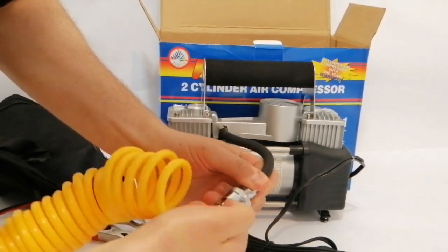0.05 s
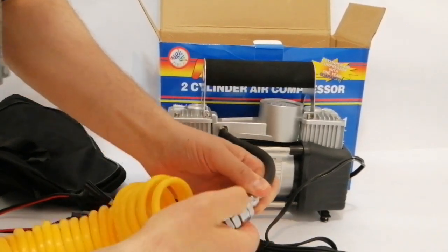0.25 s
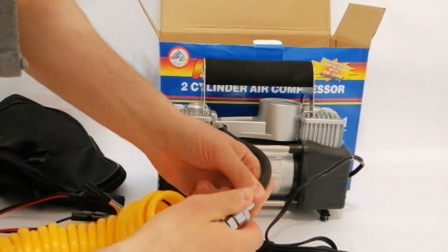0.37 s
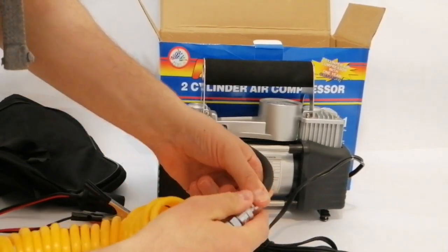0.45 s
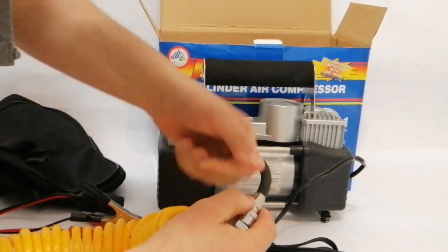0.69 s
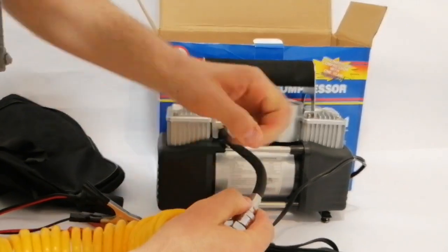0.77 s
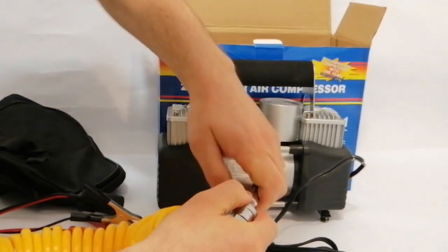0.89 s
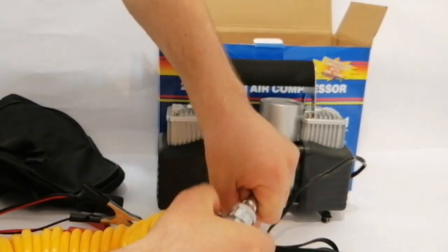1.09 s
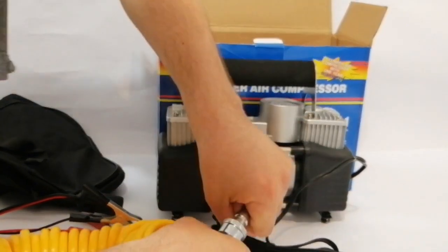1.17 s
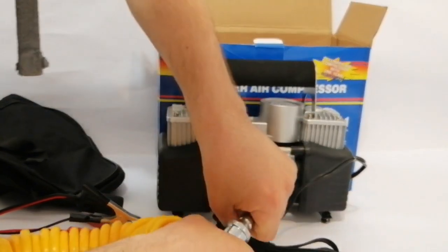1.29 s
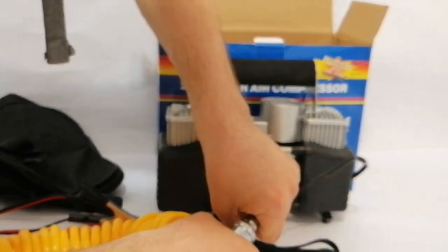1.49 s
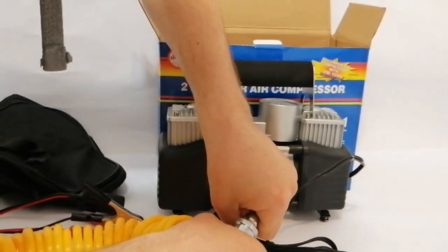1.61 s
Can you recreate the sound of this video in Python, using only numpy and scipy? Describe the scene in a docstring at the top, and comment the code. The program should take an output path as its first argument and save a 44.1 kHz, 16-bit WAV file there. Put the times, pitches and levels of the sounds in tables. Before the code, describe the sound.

Quick knocks of a coiled air hose on a table, followed by small metal coupling clicks.

```python
"""Air hose on a table

A coiled plastic air hose knocks on a table in a small quiet room while its metal fitting is handled.
Each impact gives a broadband clack and excites the damped modes of the table, which booms.
A rubber hose thumps twice, then once faintly; fingers rub by stick-slip friction, and the coupling
clicks together. Room air and a faint mains hum lie under everything."""
import sys
import numpy as np
from scipy import signal
from scipy.fft import rfft, irfft
from scipy.io import wavfile

SR = 44100
rng = np.random.default_rng(int(sys.argv[2]) if len(sys.argv) > 2 else 0)


def generate_wav(sig):
    """Save sig (samples, or channels by samples) to the path in sys.argv[1] as 16-bit PCM at SR."""
    pcm = np.round(np.clip(np.atleast_2d(sig).T, -1, 1) * 32767).astype(np.int16)
    wavfile.write(sys.argv[1], SR, pcm)


N = 72765

# Impacts of the hose: start_s, level_db, tilt_db, resonance_hz, lift_db, zing_db, boom_db,
# boom_t60_ratio, pan_db
KNOCKS = [(0.2132, -22, 9, 1690, 16, 4, -74, 0.91, -6), (0.2157, -6.5, 5.5, 1020, 3, 8, -41, 0.53, 0.5),
          (0.2182, -8, 6.5, 1610, 11.5, 4.5, -33.5, 0.83, 1),
          (.244, -8, 3.5, 1600, 1.5, -2.5, -34.5, 0.26, 2.5),
          (0.323, -12.5, 3.5, 940, 8.5, 2, -30, 0.49, -0.5),
          (0.3547, -24, 1, 700, 2.5, -3, -49, 0.28, 13.5), (0.3952, -1.5, 2, 2700, 7, -1, -25.5, 0.99, 0),
          (.4595, -9.5, -15.5, 940, -6.5, 0, -44, 0.44, 2.5),
          (0.497, -29.5, -4, 648, 19, -3, -41.5, 0.46, -5.5), (.519, -35.5, 7, 810, 1, -23, -33, 0.39, 13)]
# Spectrum of a clack: frequency_hz, level_db
CLACK_SPECTRUM = [(60, -12.5), (200, 1.5), (400, 0.5), (530, -5), (700, 5), (1000, -2.5), (1200, 1.5),
                  (1400, -10), (1650, -3.5), (2100, -6), (2700, -14), (3300, -20.5), (4300, -23),
                  (5100, -22), (6500, -29.5), (8500, -33), (12000, -36.5), (16000, -47)]
# Modes of the hand-damped fitting: pitch_hz, level_db, t60_s
FITTING_MODES = [(1275, -10, 0.3), (1621, 5.5, 0.11), (1717, -2.5, 0.14), (2060, -12, 0.098),
                 (4880, -17, 0.24)]
# Modes of the table: pitch_hz, level_db, base_t60_s
TABLE_MODES = [(68, -17, 0.61), (123.17, 2, 0.49), (159.3, -9, 0.58), (215.8, -7.5, 0.64),
               (233, -5.5, 0.48), (303, -14.5, .45), (326.4, -16.5, 0.77), (641, -9.5, 0.13),
               (1178, -20, 0.14), (1596, -25, 0.22), (2763, -24.5, 0.27)]
METAL_RISE_S = .00067


def knocks():
    """Impact excitation: each clack rings the fitting and sets the table booming until the hose settles."""
    zing_hz, fitting_db = 5300, -40.5
    settle_s, settle_db_per_s = .53, 170
    lag = round(.00013 * SR)  # the right ear hears the clacks first
    out, boom = np.zeros((2, 2, N))
    for start_s, level_db, tilt_db, hz, lift_db, zing_db, boom_db, t60_ratio, pan_db in KNOCKS:
        timbre = colour(CLACK_SPECTRUM, tilt_db, [(hz, lift_db), (zing_hz, zing_db)])
        decay_s = .0018 * amp(-.55 * level_db)  # weaker knocks stay in contact longer
        left, right = contact(timbre, decay_s)
        clack = amp(level_db) * pan(pan_db) * np.array([np.roll(left, lag), right])
        add(out, start_s, in_room(clack, wet_db=0))
        add(out, start_s, amp(level_db + zing_db + fitting_db) * ring(FITTING_MODES, METAL_RISE_S))
        table = amp(boom_db) * ring(TABLE_MODES, rise_s=.0038, t60_ratio=t60_ratio)
        add(boom, start_s, in_room(table, wet_db=-7.5))
    settled_s = np.maximum(np.arange(N) / SR - settle_s, 0)
    return out + boom * amp(-settle_db_per_s * settled_s)


# Impacts of the rubber hose: start_s, ring_db, slap_db
THUMPS = [(.354, -33.5, -20.5), (.640, -33.5, -20), (0.9667, -43, -30)]
# Spectrum of a slap: frequency_hz, level_db
SLAP_SPECTRUM = [(100, -13), (250, 6), (450, -1), (600, -2.5), (750, -5), (1200, -15), (1800, -12),
                 (2500, -17), (4000, -29), (8000, -41.5), (16000, -47)]
# Modes of the rubber hose: pitch_hz, level_db, t60_s
HOSE_MODES = [(218.1, -6, 0.31), (277.7, -18, 0.46), (323.4, 2.5, 0.11), (350, -0.5, 0.36),
              (580, -42, 0.15), (596, -14.5, 0.11), (790, -28.5, 0.45)]


def thumps():
    """Soft impact: the rubber hose gives a dull slap, and its low modes ring hollow."""
    out = np.zeros((2, N))
    for start_s, ring_db, slap_db in THUMPS:
        slap = amp(slap_db) * contact(colour(SLAP_SPECTRUM, tilt_db=0), decay_s=.0048)
        hollow = -amp(ring_db) * ring(HOSE_MODES, rise_s=.0036)
        add(out, start_s, in_room(slap, wet_db=8))
        add(out, start_s, in_room(hollow, wet_db=-9))
    return out


# Impacts in the coupling: start_s, level_db, tilt_db, resonance_hz, lift_db, decay_s, ring_db, pan_db
CLICKS = [(0.313, -32, -13, 5170, 5, 0.0017, -57, 16.5), (0.4728, -36, 6, 5600, -1, 0.00094, -52, -6),
          (0.4744, -23, -14.5, 5360, 15.5, 0.0016, -45, 3), (0.913, -50, -2, 10700, 6, 0.0025, -60, 0),
          (.930, -46.5, -1, 11300, 13, 0.0024, -65, -10), (.9595, -38, -30, 900, 12, .001, -65, 7),
          (0.996, -45, -7, 6040, 4, 0.0014, -60, 7), (1.126, -38, -20, 2160, 12, 0.0018, -60, 0),
          (1.192, -39, -16.5, 4940, 5, 0.00098, -60, 8), (1.2315, -33, -14.5, 5220, 18.5, 0.00085, -54, 4),
          (1.2328, -33.5, -6, 2440, 16, 0.00053, -55, -4.5), (1.3416, -23, -9, 2950, 3.5, 0.002, -36, -2),
          (1.3465, -17, 0, 6650, 3.5, 0.0016, -47.5, 0.5), (1.463, -66, 1, 2880, 19, .001, -58, -17),
          (1.541, -69, -13, 3430, 2, .001, -64, -5), (1.552, -40, -12, 3240, 12, 0.00059, -66, 0)]
# Spectrum of a click: frequency_hz, level_db
CLICK_SPECTRUM = [(200, -17), (900, -13.5), (1500, 0), (2600, 3), (3400, 3), (4200, -4), (5400, -3.5),
                  (6300, 2.5), (7800, 1.5), (9000, -0.5), (12500, -7.5), (16000, -14.5)]
# Modes of the coupling sleeve: pitch_hz, level_db, t60_s
SLEEVE_MODES = [(1720, -6, .35), (2514, -3, .19), (3208, -7, .3), (6019, -2, .32), (6150, -4, .3),
                (6290, -3, .32), (6476, 0, .3), (7461, -10, .24), (9528, -9, .12)]


def clicks():
    """Hard impact: brief contact of metal on metal gives a sharp tick and a faint, hand-damped ring."""
    out = np.zeros((2, N))
    for start_s, level_db, tilt_db, hz, lift_db, decay_s, ring_db, pan_db in CLICKS:
        timbre = colour(CLICK_SPECTRUM, tilt_db, [(hz, lift_db)])
        tick = in_room(pan(pan_db) * contact(timbre, decay_s), wet_db=-1.5)
        add(tick, 0, amp(ring_db) * ring(SLEEVE_MODES, METAL_RISE_S))
        add(out, start_s, amp(level_db) * tick)
    return out


# Finger strokes on hose and fitting: start_s, length_s, level_db, tilt_db
RUBS = [(0, 0.1, -76.5, 6), (0.073, 0.039, -65, -28), (0.187, 0.075, -71.5, 3), (0.907, 0.26, -71, 1),
        (1.121, 0.075, -61, -5.5), (1.17, 0.11, -66, 3), (1.531, 0.14, -75.5, 2)]
# Spectrum of a stroke: frequency_hz, level_db
RUB_SPECTRUM = [(150, 10), (500, -1.5), (1100, 2.5), (2500, 2.5), (4000, -11), (5500, -6.5), (8000, -18.5),
                (11000, -17), (16000, -29)]


def rubs():
    """Stick-slip friction: each stroke is a swell of tiny slips of random timing and strength."""
    slips_per_s = 3900
    out = np.zeros((2, N))
    for start_s, length_s, level_db, tilt_db in RUBS:
        size = round(length_s * SR)
        chance, draw = rng.random((2, N))[:, :size]
        strength = amp(-4 * np.log(draw + .045))  # many weak slips, a few strong ones
        slips = (chance < slips_per_s / SR) * strength * rng.choice([-1, 1], N)[:size]
        swell = np.sin(np.pi * np.sqrt(np.arange(size) / size))
        stroke = unit(signal.fftconvolve((slips * swell)[None], colour(RUB_SPECTRUM, tilt_db), axes=1))
        add(out, start_s, in_room(amp(level_db) * np.sqrt(size / 2) * stroke, wet_db=-1))
    return out


# Spectrum of the room air: frequency_hz, relative_density_db
AIR_SPECTRUM = [(20, 0), (35, -11), (53, -4), (80, -13.5), (107, 0.5), (146, -9), (198, -8.5), (310, -18.5),
                (357, -18.5), (600, -24), (800, -24.5), (2000, -25.5), (2670, -29.5), (10800, -43),
                (16000, -52)]
# Tones of the hum: pitch_hz, level_db
HUM_TONES = [(99.7, -63), (168, -73)]


def background():
    """Noise floor: the continuous spectrum of still room air plus the line spectrum of mains hum."""
    air_db = -61
    t, hz = np.arange(N) / SR, np.fft.rfftfreq(N, 1 / SR)
    air = irfft(rfft(diffuse(N)) * amp(read(AIR_SPECTRUM, hz)), N)
    hum = sum(amp(level_db) * np.sqrt(2) * np.sin(2 * np.pi * (pitch_hz * t + rng.random()))
              for pitch_hz, level_db in HUM_TONES)
    return amp(air_db) * np.sqrt(N) * unit(air) + hum


# Reverberation times of the room: frequency_hz, t60_s
ROOM_DECAY = [(100, 0.69), (300, 0.46), (700, 0.37), (1700, 0.35), (5000, 0.41), (9000, 0.3), (16000, 0.39)]


def in_room(sound, wet_db):
    """Reverberation: a diffuse tail follows the direct sound, each band decaying at its own rate."""
    build_up_s = .0063
    hz, t, bands = signal.stft(diffuse(SR), SR, nperseg=256)
    tail = signal.istft(bands * amp(-60 * t / read(ROOM_DECAY, hz)[:, None]), SR)[1]
    tail *= np.minimum(np.arange(tail.shape[1]) / SR / build_up_s, 1) ** 2
    direct = sound * np.ones((2, 1))
    out = amp(wet_db) * unit(signal.fftconvolve(direct, tail, axes=1)) * np.sqrt(np.sum(direct ** 2) / 2)
    add(out, 0, direct)
    return out


# Likeness of the room's sound at the two ears: frequency_hz, coherence_ratio
ROOM_COHERENCE = [(60, 0.96), (150, 1), (300, 0.71), (550, 0), (1200, 0.047), (3000, 0), (16000, 0)]


def diffuse(size):
    """Diffuse field: noise from all sides is coherent between the ears only at long wavelengths."""
    a, b = rfft(rng.standard_normal((2, size)))
    coherence = read(ROOM_COHERENCE, np.fft.rfftfreq(size, 1 / SR))
    mid, side = a * np.sqrt((1 + coherence) / 2), b * np.sqrt((1 - coherence) / 2)
    return irfft([mid + side, mid - side], size)


def contact(timbre, decay_s, size=2048):
    """Source and filter: a short burst of vibration with an even spectrum, coloured by a timbre."""
    rise_s, coherence = .00019, .71
    common, left, right = rng.standard_normal((3, size))
    t = np.arange(size) / SR
    envelope = (1 - np.exp(-t / rise_s)) * np.exp(-t / decay_s)
    burst = (np.sqrt(coherence) * common + np.sqrt(1 - coherence) * np.array([left, right])) * envelope
    whitened = irfft(np.exp(1j * np.angle(rfft(burst)))) * (envelope > .01)
    return unit(signal.fftconvolve(whitened, timbre, axes=1))


def ring(modes, rise_s, t60_ratio=1):
    """Free vibration: a struck object sounds as a sum of exponentially decaying modes."""
    t = np.arange(SR) / SR
    vibration = sum(amp(level_db - 60 * t / (t60_s * t60_ratio)) * np.sin(2 * np.pi * pitch_hz * t)
                    for pitch_hz, level_db, t60_s in modes)
    return (1 - np.exp(-t / rise_s)) * vibration


def colour(spectrum, tilt_db, resonances=(), size=2048):
    """Minimum-phase filter: a spectrum tilted about a pivot, with a peak at each resonance."""
    pivot_hz, width_octaves = 3000, .16
    hz = np.fft.rfftfreq(size, 1 / SR)
    db = read(spectrum, hz) + tilt_db * np.tanh(np.log((hz + 1) / pivot_hz))
    for centre_hz, lift_db in resonances:
        db += lift_db * np.exp(-.5 * (np.log2((hz + 1) / centre_hz) / width_octaves) ** 2)
    cepstrum = irfft(np.log(amp(db)))
    cepstrum[1:size // 2] *= 2  # folding onto positive time makes the filter causal
    cepstrum[size // 2 + 1:] = 0
    return irfft(np.exp(rfft(cepstrum)))[None]


def amp(db):
    """Decibel law: level to amplitude ratio."""
    return 10 ** (np.asarray(db) / 20)


def pan(db):
    """Interaural level difference: positive values favour the left ear."""
    return amp([[db / 2], [-db / 2]])


def read(points, hz):
    """Interpolation on a log-frequency axis."""
    frequencies, values = np.transpose(points)
    return np.interp(np.log(hz + 1), np.log(frequencies), values)


def unit(x):
    """Normalisation to a mean energy of one per channel."""
    return x / np.sqrt(np.sum(x ** 2) / len(np.atleast_2d(x)) + 1e-20)


def add(mix, start_s, sound):
    """Delay and sum: a sound joins the mix at its start time."""
    part = mix[:, round(start_s * SR):]
    part[:, :sound.shape[-1]] += sound[..., :part.shape[1]]


def scene():
    """Superposition: the pressures of all sources add."""
    return knocks() + thumps() + clicks() + rubs() + background()


def record(dry):
    """Band limiting: a linear-phase low-pass filter removes the highest treble."""
    cutoff_hz = 15950
    low_pass = signal.firwin(511, cutoff_hz, window=("kaiser", 9), fs=SR)
    return signal.oaconvolve(dry, low_pass[None], "same")


dry = scene()
out = record(dry)
generate_wav(out)
```